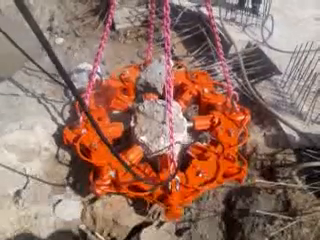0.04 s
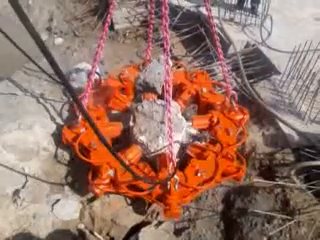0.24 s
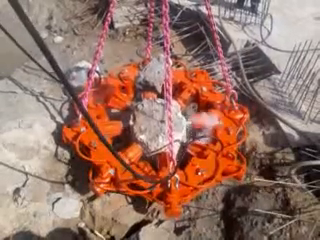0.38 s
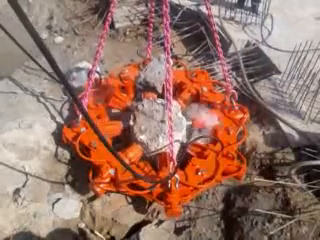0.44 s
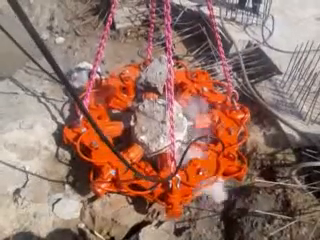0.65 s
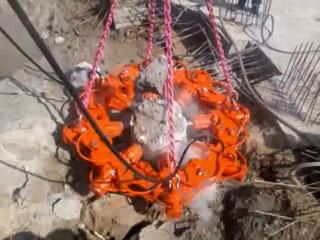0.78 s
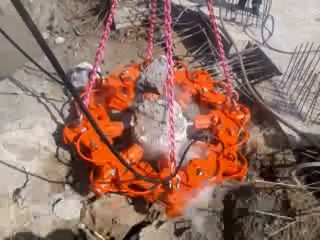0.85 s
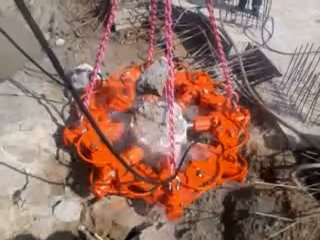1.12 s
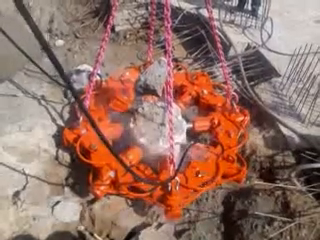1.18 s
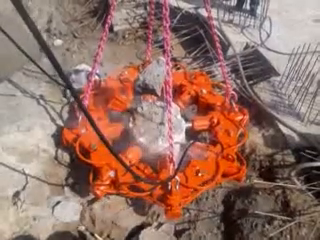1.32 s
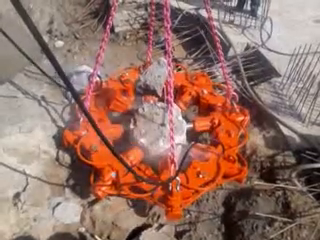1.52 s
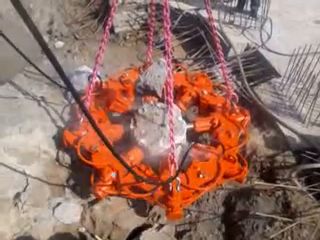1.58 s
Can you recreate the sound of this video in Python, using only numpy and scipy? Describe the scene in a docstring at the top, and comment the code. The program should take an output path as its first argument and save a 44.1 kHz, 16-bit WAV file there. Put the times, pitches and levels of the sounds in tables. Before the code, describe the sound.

A hydraulic crusher knocks and splits a concrete pile, crumbling while an engine hums.

```python
"""Hydraulic rams crushing a concrete pile

A diesel machine hums on a building site while a ring of rams squeezes the pile. A short stick-slip
judder ends in a dull knock; then the concrete splits and the impulse sets the steel frame ringing.
Crumbling and smaller cracks follow, with faint echoes. Almost nothing is heard above 4 kHz."""
import sys
import numpy as np
from scipy import signal
from scipy.fft import rfft, irfft
from scipy.io import wavfile

SR = 44100
rng = np.random.default_rng(int(sys.argv[2]) if len(sys.argv) > 2 else 0)


def transcribe(signal):
    """Save signal, clipped to [-1, 1], as a 16-bit WAV file at the path in sys.argv[1]."""
    frames = np.atleast_2d(signal).T
    limited = np.clip(frames, -1, 1)
    pcm = np.round(limited * 32767).astype(np.int16)
    wavfile.write(sys.argv[1], SR, pcm)


N = 72765
TIME = np.arange(N) / SR
WANDER_HZ = 2.5  # rms frequency deviation of the machine's tones

# normal modes of a ram: f/Hz, relative level/dB, T60/s
RAM_MODES = [(1314,-10.5,0.044),(1440,-11.5,.05),(1585,-2,.04),(1700,-3,.035),(1845,-5.5,0.051),(1990,0,.045),(2170,-8.5,.03),(2322,-6.5,.05),(2543,-9.5,.05)]
# normal modes of the steel frame: f/Hz, relative level/dB, T60/s, after-ring level/dB, after-ring T60/s
FRAME_MODES = [(945,-20,.03,-27,.3),(1360,-14,.03,-21,.2),(1731,1,.035,-8,.24),(1827,-5,.028,-9,.33),(1970,-13,.025,-22,.2),(2218,-1.5,.035,-16,.17),(2484,-1,.035,-11,.22),(2595,-4,.025,-15,.18),(2860,-7,.035,-17,.2)]


def from_db(db):
    """Amplitude ratio of a level in decibels."""
    return 10 ** (np.asarray(db) / 20)


def rms_one(x):
    """Normalisation to unit rms."""
    return x / np.sqrt(np.mean(x ** 2) + 1e-20)


def match_energy(x, envelope):
    """Normalisation of x to the energy of an envelope."""
    return rms_one(x) * np.sqrt(np.mean(envelope ** 2))


def drift(corner_hz):
    """Low-passed Gaussian noise: a slow fluctuation of unit rms."""
    pole = np.exp(-2 * np.pi * corner_hz / SR)
    return rms_one(signal.lfilter([1], [1, -2 * pole, pole * pole], rng.standard_normal(N + SR))[SR:])


def colour(x, spectrum, tilt_db=0):
    """Spectral shaping, with a tilt in dB per octave; unit rms."""
    hz, db = np.transpose(spectrum)
    octave = np.log2(np.maximum(np.arange(N // 2 + 1) * SR / N, 1))
    shape_db = np.interp(octave, np.log2(hz), db)
    slope_db = tilt_db * np.clip(octave, *np.log2(hz[[0, -1]]))
    return rms_one(irfft(rfft(x) * from_db(shape_db + slope_db), N))


def resonate(force, hz, t60):
    """Forced response of a damped oscillator that radiates no bass."""
    radius = from_db(-60 / (max(t60, .002) * SR))
    angle = 2 * np.pi * hz / SR
    return signal.lfilter([1, -2, 1], [1, -2 * radius * np.cos(angle), radius * radius], force + 1e-18)


def burst(start, db, rise, hold, fall):
    """Transient envelope: linear rise, hold, exponential decay; times in seconds."""
    t = TIME - start
    attack = np.clip(t / rise, 0, 1)
    decay = np.exp(-np.maximum(t - rise - hold, 0) / fall)
    return from_db(db) * attack * decay


def grains(per_second=3500, spread_db=3):
    """Shot noise: a Poisson stream of tiny snaps of uneven size; unit rms."""
    sizes = from_db(spread_db * np.minimum(rng.exponential(1, N), 4)) * rng.choice([-1, 1], N)
    return rms_one(sizes * (rng.random(N) < per_second / SR))


def struck(envelope, modes, contact_hz=2600):
    """Modal superposition: snaps, low-passed by a soft contact, drive each mode to its level."""
    contact = signal.butter(2, contact_hz, fs=SR, output="sos")
    force = signal.sosfilt(contact, envelope * grains() + 1e-18)
    return sum((-1) ** k * from_db(db) * rms_one(resonate(force, hz, t60))
               for k, (hz, db, t60) in enumerate(modes))


def machine(firing_hz=40, firing_depth=.12):
    """Engine firing modulates the amplitude of broadband noise beneath wavering tones."""
    # tones of the hum: f/Hz, rms level/dB before the swell
    hum_tones = [(428,-53),(517,-48),(544,-46.5),(700,-53.5),(829,-56.5),(882,-55.5),(906,-51),(1050,-56.5),(1244,-56),(1556,-56.5),(1997,-55.5)]
    # noise spectrum: f/Hz, relative density level/dB
    noise_spectrum = [(20,-33),(65,-13.5),(125,-12),(175,-2.5),(220,0),(290,0),(390,-2.5),(560,-3),(850,-5.5),(1100,-8.5),(1900,-7.5),(2400,-13),(2900,-17),(3200,-13),(3550,-23),(4100,-34)]
    # slow swell, taken about its mean: t/s, level/dB
    swell_curve = [(0,-35),(.4,-34.9),(.8,-35.6),(1.1,-35.8),(1.3,-35.2),(1.48,-34.3),(1.65,-35)]
    tones = 0
    for hz, db in hum_tones:
        cycles = np.cumsum(hz + WANDER_HZ * drift(4.9)) / SR + rng.random()
        amplitude = np.sqrt(2) * from_db(db + 2 * drift(9))
        tones += amplitude * np.sin(2 * np.pi * cycles)
    swell_db = np.interp(TIME, *np.transpose(swell_curve))
    throb = 1 + firing_depth * np.sin(2 * np.pi * (firing_hz * TIME + rng.random()))
    noise = from_db(-35) * throb * colour(rng.standard_normal(N), noise_spectrum)
    return from_db(swell_db - swell_db.mean()) * (tones + noise)


def drone(hz=168, throb_hz=11, throb_depth=.5):
    """Amplitude modulation at a wandering rate makes the machine's deep note throb unevenly."""
    # swell of the note: t/s, relative level/dB
    swell_curve = [(0,-45),(.2,-42),(.45,-43),(.8,-45),(1.05,-44),(1.3,-41),(1.5,-38.5),(1.65,-43)]
    throb_cycles = np.cumsum(throb_hz + 3 * drift(3)) / SR + rng.random()
    throb = 1 + throb_depth * np.sin(2 * np.pi * throb_cycles)
    cycles = np.cumsum(hz + WANDER_HZ * drift(5)) / SR + rng.random()
    level_db = np.interp(TIME, *np.transpose(swell_curve)) - 1.5
    return from_db(level_db) * rms_one(throb * np.sin(2 * np.pi * cycles))


def echoes(direct):
    """Reflection from the ground and nearby walls returns delayed, weaker copies."""
    # reflections: delay t/s, level/dB re the direct sound
    reflections = [(.023,-20.5),(.041,-22.5)]
    return sum(from_db(db) * np.interp(TIME - delay, TIME, direct, left=0) for delay, db in reflections)


def cracks():
    """Small brittle fractures radiate grit noise and excite the modes of frame and rams."""
    # fractures: onset t/s, level/dB, rise t/s, hold t/s, fall t/s, grit tilt/(dB per octave),
    # then relative level/dB of the grit, of the frame and of the rams
    fractures = [ (.561, -32, .001, .008, .006, -1, -2, -5, -15.5),
                 (.5933, -23.5, .001, .002, .004, -0.5, -4, -5.5, -5),
                 (.603, -26.5, .002, .015, .006, -1.5, -1, -8.5, -11.5),
                 (.6585, -28.5, .006, .003, .009, 4, -1, -12.5, -10),
                 (.876, -33, .003, .010, .007, 0, -5.5, -8, -2),
                 (.9038, -25, .001, .007, .002, 0, -8, -9, -1),
                 (.9445, -35.5, .001, .02, .01, -0.5, -7, -9, -2),
                 (1.345, -34, .002, .003, .004, -2.5, -1.5, -12, -7.5),
                 (1.559, -36, .002, .015, .01, -1, -4, -14, -3.5)]
    # spectrum of chipping concrete: f/Hz, relative density level/dB
    chip_spectrum = [(40,-39.5),(150,-17.5),(500,-9.5),(1100,-2.5),(1450,-5),(1900,1),(2250,-4),(2600,-2),(3000,-8.5),(3300,-7.5),(4100,-27.5)]
    clank_modes = [mode[:3] for mode in FRAME_MODES]
    sound = 0
    for start, db, rise, hold, fall, tilt_db, grit_db, frame_db, ram_db in fractures:
        envelope = burst(start, db, rise, hold, fall)
        grit = envelope * colour(grains(), chip_spectrum, tilt_db)
        sound += from_db(grit_db) * match_energy(grit, envelope)
        sound += from_db(frame_db) * match_energy(struck(envelope, clank_modes), envelope)
        sound += from_db(ram_db) * match_energy(struck(envelope, RAM_MODES), envelope)
    return sound


def judder(start=.2232, hz=288, swell_s=.019, swell_db=11.5):
    """Stick-slip: the loaded frame oscillates for a few growing cycles before it slips."""
    t = TIME - start
    swell = from_db(swell_db * np.clip(t / swell_s - 1, -1, 0))
    envelope = burst(start, db=-11, rise=.001, hold=swell_s, fall=.005)
    return swell * envelope * np.sin(2 * np.pi * hz * t)


def knock():
    """Friction and impact: a ram creaks, then jolts forward, ringing and grinding on the concrete."""
    # spectrum of the grinding: f/Hz, relative density level/dB
    grit_spectrum = [(25,-28),(100,0),(330,1),(550,-7),(1100,-12),(1600,0),(2300,-0.5),(2800,-2.5),(3400,-6),(4100,-21)]
    creak = burst(start=.217, db=-29, rise=.018, hold=.008, fall=.01)
    jolt = burst(start=.2405, db=-13.5, rise=.005, hold=.012, fall=.009)
    envelope = creak + jolt
    ram = match_energy(struck(envelope, RAM_MODES), envelope)
    return ram + from_db(-8.5) * envelope * colour(grains(), grit_spectrum)


def split(start=.4718, db=-9.6):
    """Brittle fracture of the pile shocks the frame into a two-stage decay while grit crumbles."""
    # spectrum of the breaking concrete: f/Hz, relative density level/dB
    grit_spectrum = [(40,-45),(150,-24),(500,-13),(1000,-3.5),(1800,0.5),(2700,0.5),(3300,-10),(4100,-25)]
    modes = np.array(FRAME_MODES)
    fracture = burst(start, db, rise=.006, hold=.010, fall=.003)
    crumble = burst(start, db - 16, rise=.015, hold=.025, fall=.04)
    clank = struck(fracture, modes[:, :3])
    after_ring = struck(fracture, modes[:, [0, 3, 4]])
    grit = (from_db(-15.5) * fracture + crumble) * colour(grains(), grit_spectrum)
    return match_energy(clank + after_ring, fracture) + grit


def scene():
    """Superposition of the pile breaker, its echoes and the machine, in one channel."""
    breaker = judder() + knock() + split() + cracks()
    return (breaker + echoes(breaker) + machine() + drone())[None]


def record(dry):
    """Band limiting removes the treble; clipping the tip of the highest peak adds a tiny click."""
    treble_edge = signal.butter(8, 3940, fs=SR, output="sos")
    treble_stop = signal.cheby2(16, 70, 4900, fs=SR, output="sos")
    click_lowpass = signal.cheby2(12, 70, 16500, fs=SR, output="sos")
    narrow = signal.sosfilt(treble_stop, signal.sosfilt(treble_edge, dry))
    ceiling = .92 * np.abs(narrow).max()
    return signal.sosfilt(click_lowpass, np.clip(narrow, -ceiling, ceiling))


dry = scene()
out = record(dry)
transcribe(out)
```